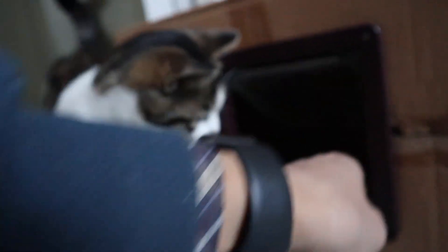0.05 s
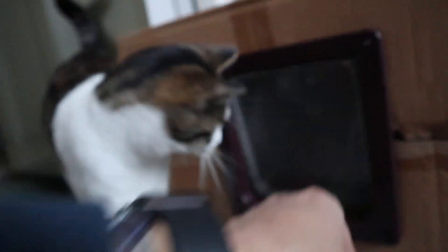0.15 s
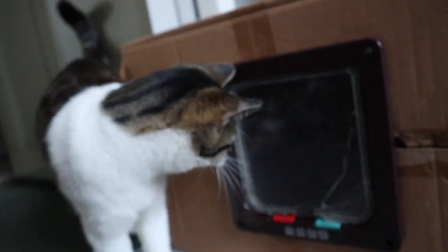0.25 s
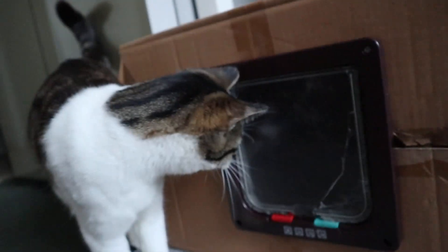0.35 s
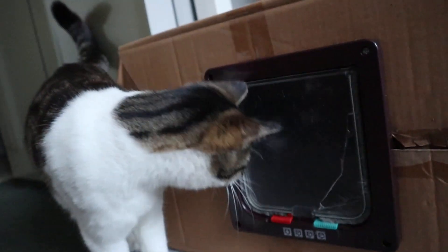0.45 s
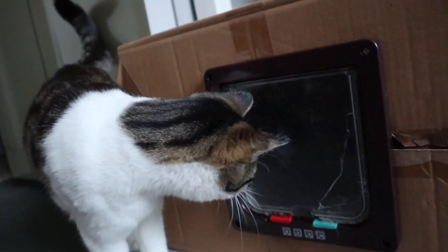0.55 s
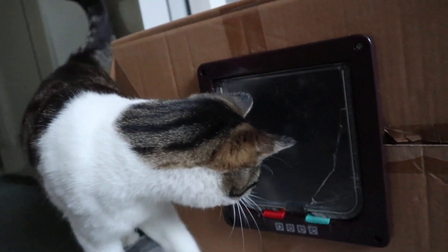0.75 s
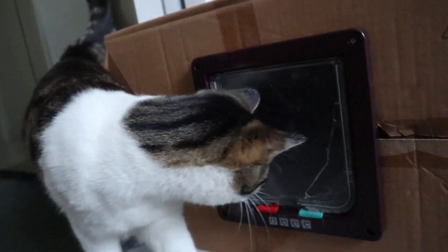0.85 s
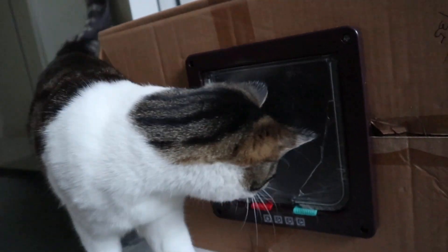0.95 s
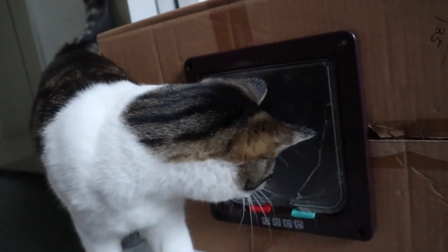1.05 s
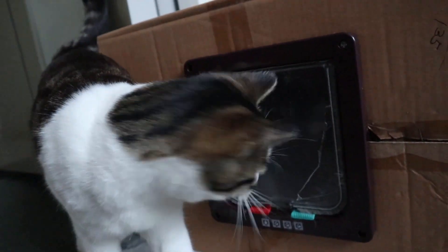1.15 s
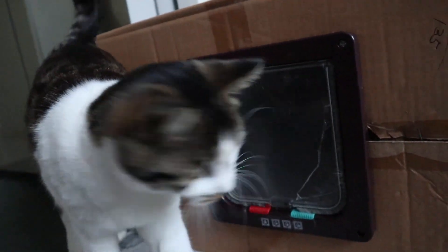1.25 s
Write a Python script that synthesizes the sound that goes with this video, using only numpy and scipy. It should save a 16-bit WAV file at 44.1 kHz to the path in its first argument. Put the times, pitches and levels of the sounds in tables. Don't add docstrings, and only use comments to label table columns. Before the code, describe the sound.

A plastic pet flap on a cardboard box gives a short faint hinge creak, then slaps its frame with a quick bouncing clack and hollow boom; later faint cat paw and claw ticks, close stereo, small quiet room.

```python
import sys
import numpy as np
from scipy import signal
from scipy.io import wavfile

SR = 44100
rng = np.random.default_rng(int(sys.argv[2]) if len(sys.argv) > 2 else 0)


def master(y):
    cut = np.clip(np.atleast_2d(y).T, -1, 1)
    pcm = np.round(cut * 32767)
    wavfile.write(sys.argv[1], SR, pcm.astype(np.int16))


def gain_from_db(level_db):
    decades = np.asarray(level_db, float) / 20
    return 10 ** decades


N = 57330
LEAD = 8820

# (time [s], signed push on box [0-1], plastic crack level [dB])
CONTACTS = [(-0.075, .12, -33.5), (0.1999, -.05, -60), (0.2052, .02, -28.5), (0.2078, -.08, -21.5),
            (0.2092, 0.32, -30.5), (0.2106, -.45, -36), (0.212, .8, -12.5), (0.2135, 0, -27.5),
            (0.2169, .15, -35), (0.2228, .12, -20.5), (0.2262, -.15, -26.5), (0.2405, 0.04, -41),
            (0.2495, 0.03, -54), (0.2615, .03, -54)]
# (frequency [Hz], level [dB], T60 [s])
BOX_MODES = [(102.6, -21, 0.33), (140.4, -24, 0.66), (182.4, -26, 0.36), (219.8, -19.5, .25),
             (263, -29, .2), (319.4, -23, .2), (355, -22.5, 0.04), (400, -4, 0.0092), (479.2, -13, 0.14),
             (563.3, -18, 0.1), (673, -18, 0.12), (722.7, -16, 0.12), (437.4, -17.5, 0.11),
             (160.3, -14.5, 0.14)]
# (frequency [Hz], level [dB], T60 [s])
FRAME_MODES = [(1273, -37, .03), (1495, -10.5, 0.023), (1988, -4, 0.017), (2184, -9.5, 0.014),
               (2572, -6, 0.018), (2775, -13, .03), (3200, -11, 0.017), (3700, -6.5, .015),
               (4498.3, -5.5, 0.0069), (5300, -16, 0.017), (6160, -22.5, .008), (7800, -34, .006),
               (10100, -42, .003)]
# (time [s], slip rate [Hz], level [dB], bite [dB])
HINGE_MOTION = [
    (.0505, 355, -37.5, 2.5),
    (.062, 340, -54, 11),
    (.073, 343.8, -31, -3),
    (.083, 323.2, -41.5, -22),
    (.1, 345.4, -40.5, -15),
    (.12, 336.7, -36, -25.5),
    (.127, 288.7, -48, -10.5),
    (.14, 290, -47.5, -13),
    (.175, 251, -52, -7),
]
# (frequency [Hz], level [dB], T60 [s])
HINGE_MODES = [(327.2, 6.5, 0.026), (469.4, -10, 0.018), (536, 0, 0.028), (670, -6.5, .015),
               (840, -14, 0.088), (1140, -38.5, 0.017), (1528, -18.5, .04), (1710, -25.5, 0.023)]
# (time [s], peak level [dB], frequency [Hz], length [cycles])
PAW_TOUCHES = [
    (.672, -53, 1200, 5),
    (.727, -54, 800, 8),
    (.7786, -47, 900, 4),
    (.7792, -38, 2300, 7),
    (.797, -53, 3800, 40),
    (.8195, -48, 450, 4),
    (.822, -55, 3500, 25),
    (.8745, -45, 620, 7),
    (.935, -53, 500, 4),
]
# (time [s], level [dB])
STIR = [(0, -58.5), (.2, -54.5), (.45, -60.5), (.6, -59), (.74, -59), (.8, -55), (.88, -56.5), (.95, -58.5),
        (1.05, -56), (1.15, -57.5), (1.3, -60)]
# (frequency [Hz], density [dB per Hz])
HUSH_MID = [(25, -27.5), (50, -1.5), (90, -9.5), (182, -6.5), (278, -10), (2380, -22.5), (7820, -40),
            (14000, -68.5)]
# (frequency [Hz], density [dB per Hz])
HUSH_SIDE = [(15, -84), (25, -48.5), (173, -6), (278, -5.5), (472, 2), (1130, 3.5), (7820, -14),
             (12300, -32), (14000, -27.5)]
# (time [s], level [dB])
RUMBLE = [(0, -43), (.03, -54), (.12, -51), (.3, -50.5), (.42, -58.5), (.52, -58), (.6, -63), (.7, -62),
          (.78, -66.5), (.82, -53.5), (.9, -55.5), (.96, -80), (1.0, -52.5), (1.06, -74.5), (1.11, -72),
          (1.18, -51.5), (1.24, -61.5), (1.3, -59.5)]
# (frequency [Hz], T60 [s])
ROOM_T60 = [(80, 1), (250, 0.3115), (1000, 0.3339), (3000, 0.1455), (8000, 0.0029)]
# (frequency [Hz], level [dB])
ROOM_MID = [(80, -11), (300, -9), (1000, -1), (3000, 1.5), (8000, -16)]
# (frequency [Hz], level [dB])
ROOM_SIDE = [(80, -20.5), (300, -26), (800, -12.5), (3000, -7), (8000, -11)]

CONTACT_HZ, BOX_LOW_HZ, BOX_SIDE_DB = 953.3, 75, -13
CRACK_T60_S, SNAP_DB, SNAP_LOW_HZ, SNAP_HIGH_HZ = 0.0095, -24.5, 1820, 5200
RATTLE_DB, RATTLE_T60_S, RATTLE_HZ = -34, 0.19, 5500
FRAME_SIDE_DB, FRAME_SIDE_TILT_DB_PER_OCT = -8.5, 6.5
ROOM_DELAY_S, PORTS_HZ = 0.004, 700
HUSH_MID_DB, HUSH_SIDE_DB, STIR_SHARE = -59, -60, 0.937
RUMBLE_HZ, RUMBLE_WIDTH_HZ = 50.75, 3.6
SLIP_JITTER, SLIP_UNEVEN_DB, RUB_DB, SLIP_SOFT_HZ = 0.035, 1.8, -12, 1720
PUFF_S, PUFF_HZ, PUFF_DB, PUFF_T60_S = 0.1915, 75, -31, 0.05
THUD_S, THUD_HZ, THUD_DB, THUD_T60_S = 0.2605, 207, -16, 0.036
PUFF_SOFT_HZ = 300
MIC_LOW_HZ, PEAK_LIMIT, CUTOFF_HZ = 41, 1.4, 14700


def butter(x, order, hz, kind="low"):
    return signal.sosfilt(signal.butter(order, hz, kind, fs=SR, output="sos"), x)


def rms_one(x):
    return x / np.sqrt(np.mean(x ** 2) + 1e-20)


def in_time(rows):
    s, *columns = np.transpose(rows)
    return [np.interp(np.arange(N) / SR, s, c) for c in columns]


def at_hz(points, hz):
    table_hz, value = np.transpose(points)
    return np.interp(np.log(hz), np.log(table_hz), value)


def mid_side_db(mid_db, side_db):
    return np.array([[mid_db], [side_db]])


def drift(rate_hz):
    r = np.exp(-2 * np.pi * rate_hz / SR)
    white = rng.standard_normal(N + SR)
    return rms_one(signal.lfilter([1], [1, -2 * r, r * r], white)[SR:])


def ring(clicks, hz, t60_s):
    r, w = gain_from_db(-60 / (t60_s * SR)), 2 * np.pi * hz / SR
    return signal.lfilter([0, np.sin(w)], [1, -2 * r * np.cos(w), r * r], clicks + 1e-18)


def train(s, sizes):
    out = np.zeros(N + LEAD)
    out[(np.asarray(s) * SR).astype(int) + LEAD] = sizes
    return out


def bands(length):
    edges_hz = 24 * 2 ** np.arange(0, 9.6, 0.5)
    white = rng.standard_normal((2, 2, length))
    for k, (low, high) in enumerate(zip(edges_hz, edges_hz[1:])):
        yield np.sqrt(low * high), butter(white[k % 2], 2, [low, high], "band")


def ports(side):
    return butter(side, 2, PORTS_HZ, "high")


def box_boom():
    s, push, _ = np.transpose(CONTACTS)
    soft_push = butter(train(s, push), 4, CONTACT_HZ)
    boom = sum(gain_from_db(db) * ring(soft_push, hz, t60_s) for hz, db, t60_s in BOX_MODES)
    return butter(boom, 2, BOX_LOW_HZ, "high")


def contact_spray(t60_s):
    s, _, crack_db = np.transpose(CONTACTS)
    envelope = signal.lfilter([1], [1, -gain_from_db(-60 / (t60_s * SR))], train(s, gain_from_db(crack_db)))
    return envelope * rng.standard_normal((2, N + LEAD))


def plastic_crack():
    spray = contact_spray(CRACK_T60_S)
    buzz = contact_spray(RATTLE_T60_S)
    out = gain_from_db(SNAP_DB) * butter(spray, 3, [SNAP_LOW_HZ, SNAP_HIGH_HZ], "band")
    out = out + gain_from_db(RATTLE_DB) * butter(buzz, 3, [SNAP_LOW_HZ, RATTLE_HZ], "band")
    for hz, db, t60_s in FRAME_MODES:
        side_db = FRAME_SIDE_DB + FRAME_SIDE_TILT_DB_PER_OCT * np.log2(hz / 2000)
        out = out + ring(spray, hz, t60_s) * gain_from_db(mid_side_db(db - 24, db - 23.5 + side_db))
    return out


def room(x):
    t = np.arange(SR // 2) / SR
    tail = 0
    for hz, noise in bands(len(t)):
        start_db = mid_side_db(at_hz(ROOM_MID, hz), at_hz(ROOM_SIDE, hz))
        tail = tail + noise * gain_from_db(start_db - 60 * t / at_hz(ROOM_T60, hz))
    tail = np.pad(tail * 0.02, ((0, 0), (int(ROOM_DELAY_S * SR), 0)))
    mid, side = signal.fftconvolve(x[None], tail, axes=1)[:, :len(x)]
    return np.array([mid, ports(side)])


def hush(patchy_db):
    stir_db, = in_time(STIR)
    out = 0
    for hz, noise in bands(N):
        band_db = mid_side_db(at_hz(HUSH_MID, hz), at_hz(HUSH_SIDE, hz))
        out = out + noise * gain_from_db(band_db + patchy_db * drift(10))
    swell = gain_from_db(STIR_SHARE * (stir_db - stir_db.mean()))
    return swell * np.array([gain_from_db(HUSH_MID_DB) * rms_one(out[0]), gain_from_db(HUSH_SIDE_DB) * rms_one(out[1])])


def rumble():
    db, = in_time(RUMBLE)
    hz = RUMBLE_HZ + RUMBLE_WIDTH_HZ * drift(5.5)
    return gain_from_db(db - 0.5) * np.sin(2 * np.pi * np.cumsum(hz) / SR)


def hinge():
    rate_hz, db, bite_db = in_time(HINGE_MOTION)
    t = np.arange(N) / SR
    moving = (t > HINGE_MOTION[0][0]) * (t < HINGE_MOTION[-1][0])
    turns = np.cumsum(moving * rate_hz * (1 + SLIP_JITTER * drift(220))) / SR
    slips = (np.diff(np.floor(turns), prepend=0) != 0) * gain_from_db(SLIP_UNEVEN_DB * drift(200))
    slips[np.argmax(moving)] = 1
    rub = moving * gain_from_db(RUB_DB - 14) * rng.standard_normal(N)
    force = butter(gain_from_db(db - 4) * (slips + rub), 2, SLIP_SOFT_HZ)
    out = 0
    for k, (hz, level_db, t60_s) in enumerate(HINGE_MODES):
        drive = np.pad(force * gain_from_db(bite_db * (k > 0)), (LEAD, 0))
        out = out + gain_from_db(level_db) * ring(drive, hz, t60_s)
    return out


def puff_and_thud():
    puff = ring(train([PUFF_S], gain_from_db(PUFF_DB)), PUFF_HZ, PUFF_T60_S)
    thud = ring(train([THUD_S], gain_from_db(THUD_DB)), THUD_HZ, THUD_T60_S)
    return butter(puff + thud, 2, PUFF_SOFT_HZ)


def paws():
    out = 0
    for s, db, hz, cycles in PAW_TOUCHES:
        out = out + butter(ring(train([s], gain_from_db(db)), hz, cycles / hz), 2, 1.8 * hz)
    return out


def scene():
    body = box_boom() + puff_and_thud()
    near = plastic_crack() + np.array([body, gain_from_db(BOX_SIDE_DB) * ports(body)])
    near = near + hinge() * gain_from_db(mid_side_db(0, -26)) + paws() * gain_from_db(mid_side_db(0, -6))
    mid, side = (near + room(near[0]))[:, LEAD:] + hush(patchy_db=1.5)
    mid = mid + rumble()
    return np.array([mid + side, mid - side])


def top_cut(x):
    return signal.sosfilt(signal.butter(12, 14740, fs=SR, output="sos"), x)


def record(dry):
    rolled = butter(dry, 2, MIC_LOW_HZ, "high")
    rounded = PEAK_LIMIT * np.tanh(rolled / PEAK_LIMIT)
    mix = signal.sosfilt(signal.cheby2(10, 60, CUTOFF_HZ, fs=SR, output="sos"), rounded)
    return top_cut(mix)


dry = scene()
out = record(dry)
master(out)
```